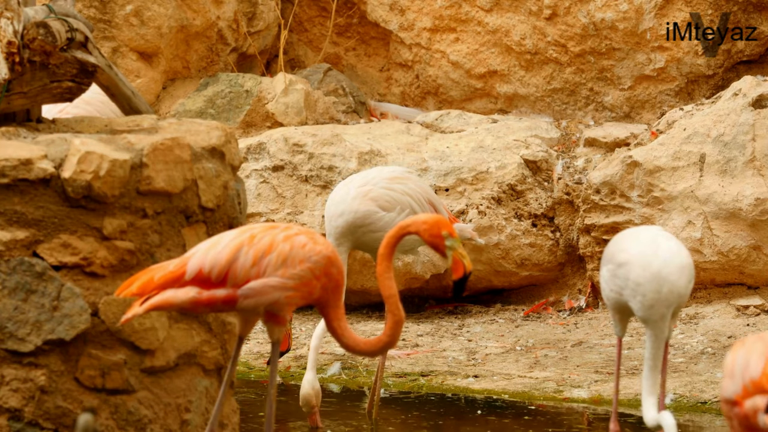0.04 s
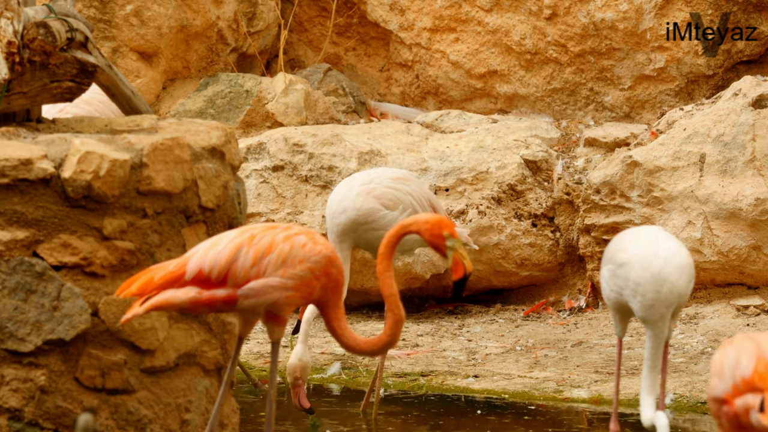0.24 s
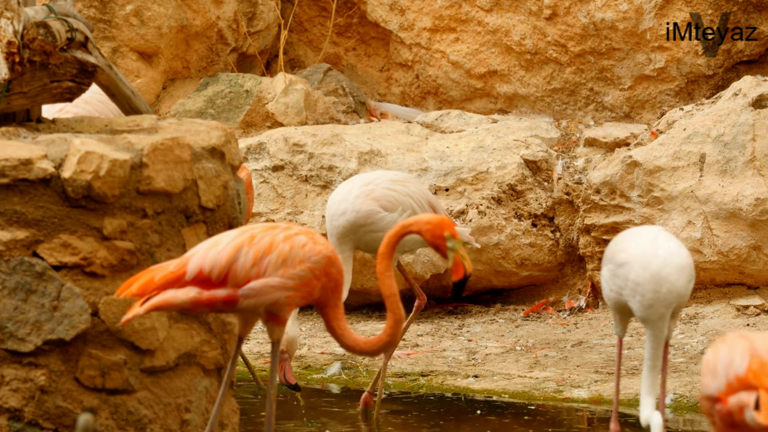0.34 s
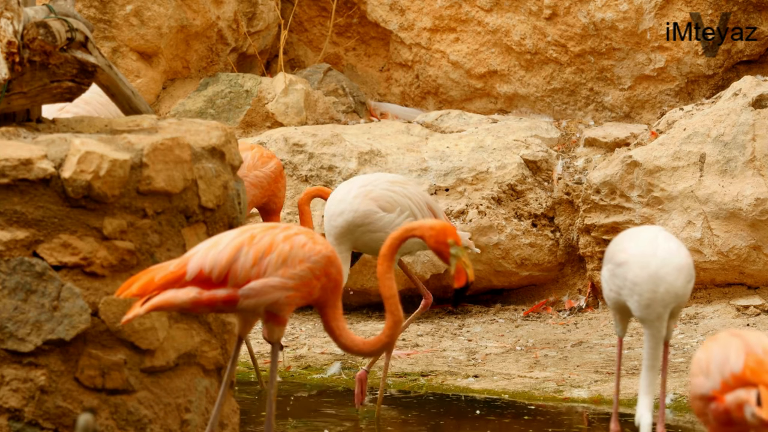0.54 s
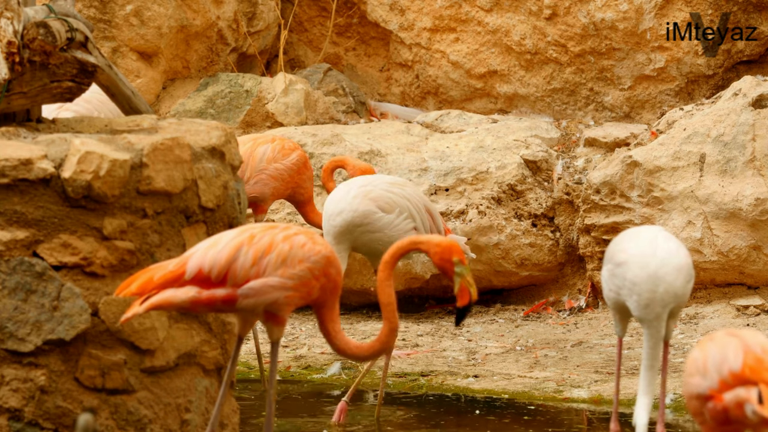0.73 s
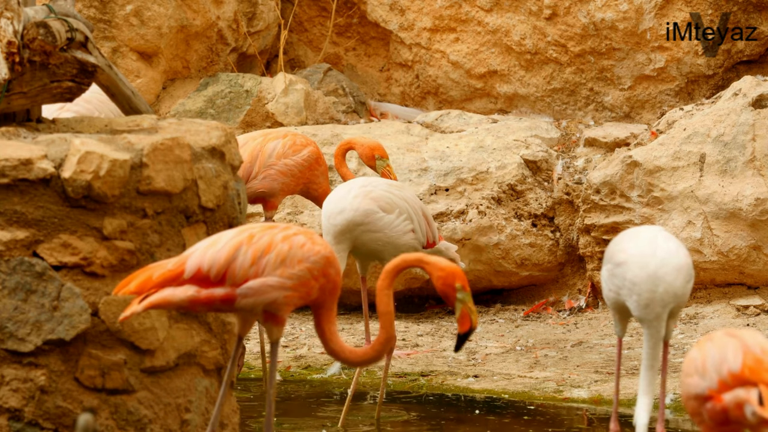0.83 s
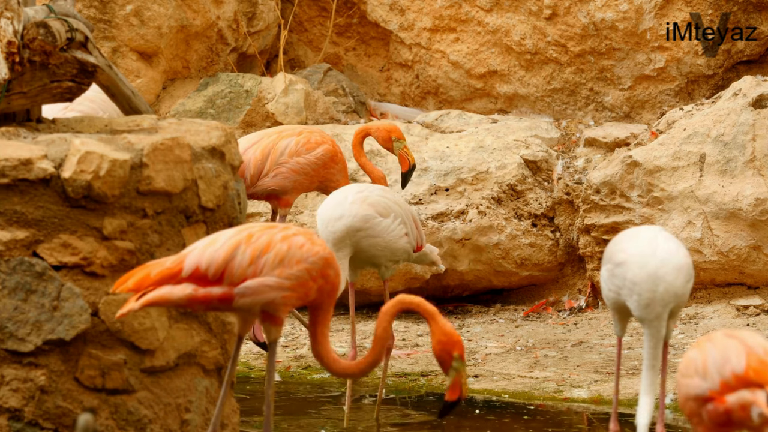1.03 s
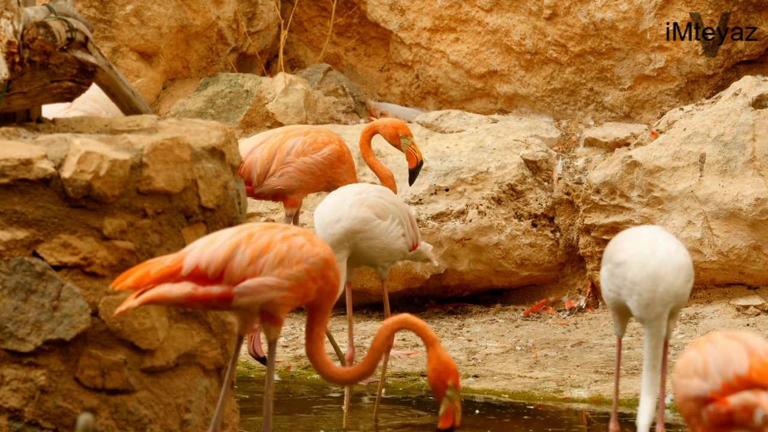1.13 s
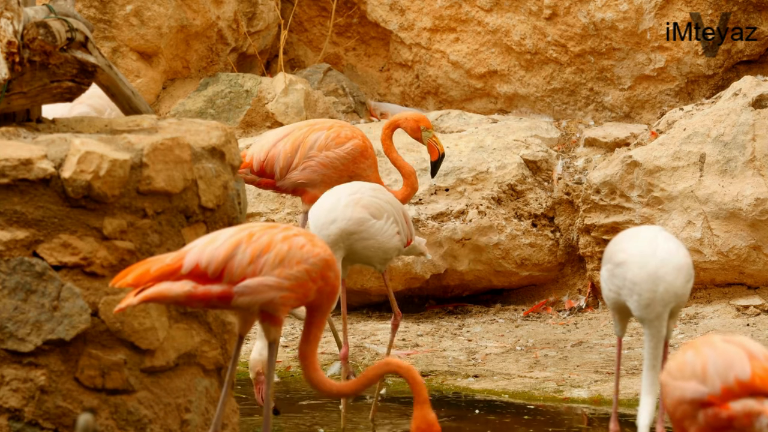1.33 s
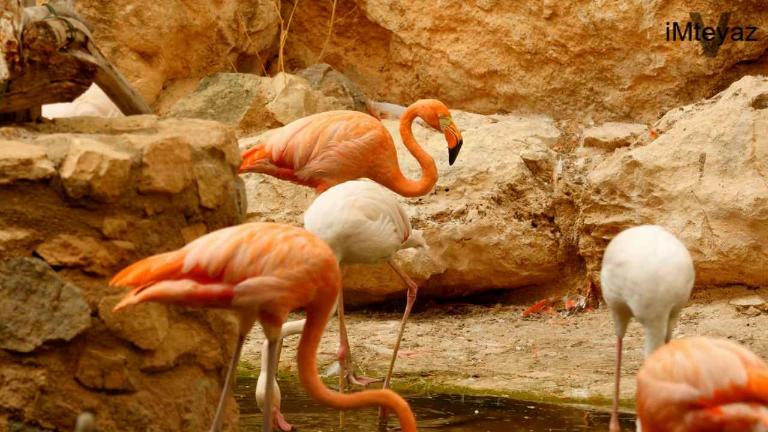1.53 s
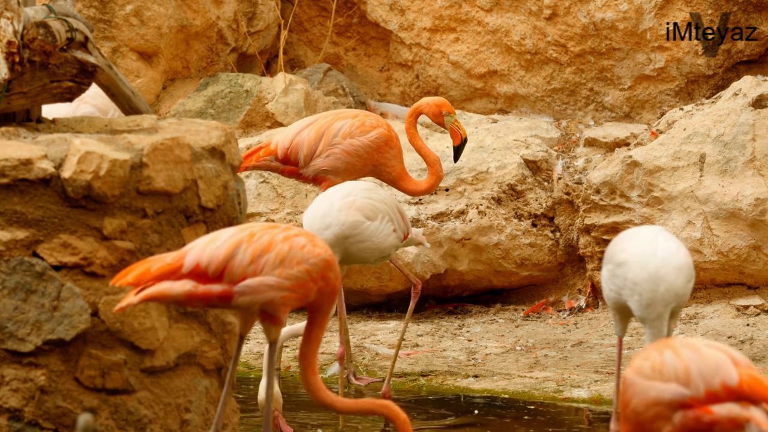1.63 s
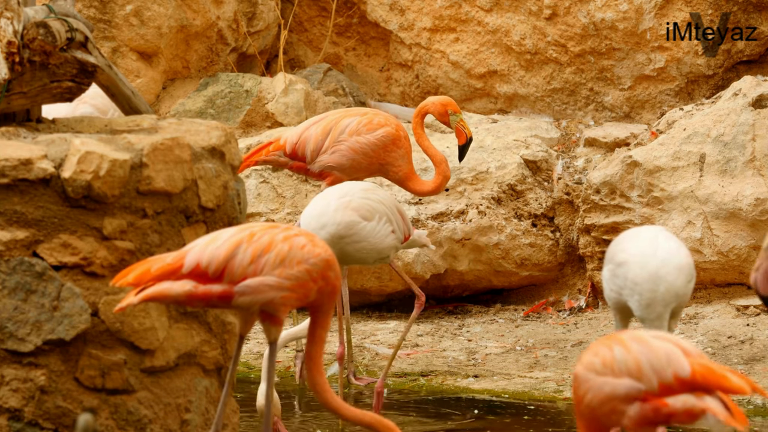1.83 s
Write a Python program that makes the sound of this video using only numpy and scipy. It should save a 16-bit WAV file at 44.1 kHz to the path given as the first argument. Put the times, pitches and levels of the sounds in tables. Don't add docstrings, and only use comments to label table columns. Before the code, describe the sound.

Flamingo honks, very short, raspy and nasal, sound near centre at about 0.2, 0.46, 0.73, 1.0, 1.28 and 1.56 seconds. The first are loud and bright; later ones are lower, duller and softer. A second bird answers faintly far right at 0.6, 1.0, 1.25 and 1.5. Rocks return echoes and a blurred tail. Soft grunts from 0.8, swelling distant rumble, thin steady insect hiss.

```python
import sys
import numpy as np
from scipy import signal
from scipy.io import wavfile
from scipy.ndimage import uniform_filter1d

SR = 44100
rng = np.random.default_rng(int(sys.argv[2]) if len(sys.argv) > 2 else 0)


def bounce(signal):
    frames = np.transpose(np.atleast_2d(signal))
    limited = np.clip(frames, -1, 1)
    pcm = np.round(limited * 32767).astype(np.int16)
    wavfile.write(sys.argv[1], SR, pcm)


def amplitude_ratio(level_db):
    exponent = np.asarray(level_db, float) / 20
    return 10 ** exponent


N = 81585
LEAD_S = 0.4
TRACK = N + int(LEAD_S * SR)
CALL_SIZE = 4096
CALL_LEAD = 8


def level(x, db):
    return x * amplitude_ratio(db) / np.sqrt(np.mean(x ** 2))


def ring(x, hz, width_hz):
    return signal.lfilter(*signal.iirpeak(hz, hz / width_hz, fs=SR), x)


def walk(rate, size):
    hold = int(SR / rate)
    stairs = np.repeat(rng.standard_normal(size // hold + 1), hold)
    return 1.37 * uniform_filter1d(uniform_filter1d(stairs, hold), hold)[:size]


def curve(table, hz):
    points = np.array(table)
    return np.interp(np.log(hz), np.log(points[:, 0]), points[:, 1])


def stereo(mid, side):
    return np.array([mid + side, mid - side])


def throat(length, hz, chance, size):
    sag = 0.34
    jitter, shimmer_db, breath_db = 0.055, 2.2, -18
    sample = np.arange(size)
    share = sample / SR / length
    turns = np.cumsum(hz * (1 - sag * np.minimum(share, 1))) / SR

    pulse = np.arange(64)
    uneven = jitter * chance[:64] * (pulse > 0)
    at = np.interp(pulse + uneven, turns, sample) + CALL_LEAD
    near = sample[None] - at[:, None]
    strength = amplitude_ratio(shimmer_db * chance[64:128])[:, None]
    clicks = (strength * np.sinc(near) * np.exp(-(near / 6) ** 2)).sum(axis=0)
    breath = amplitude_ratio(breath_db) * np.sqrt(hz / SR) * chance[128:128 + size]
    return clicks + breath, share, turns


def effort(share, peak, start_db, end_db):
    held = min(peak + 0.29, 0.95)
    swell_db = np.interp(share, [0, peak, held, 1], [start_db, 0, max(-3, end_db), end_db])
    stop = np.clip((1.1 - share) / 0.3, 0, 1)
    return amplitude_ratio(swell_db) * stop


def put(out, x, start):
    i = int((start + LEAD_S) * SR) - CALL_LEAD
    return out + np.pad(x, (i, TRACK - i - len(x)))


def near_bird():
    # start in seconds, level in dB, length in seconds, first pitch in Hz, brightness in dB per octave.
    near_honks = [
        (-.075, -16.5, 0.041, 724.8, -4.5),
        (.2050, -13, 0.036, 725.2, 3),
        (0.4627, -13.5, 0.036, 722, 1.5),
        (0.7327, -15.5, .038, 690, -3),
        (1.0023, -16, .042, 657, -6.5),
        (1.277, -18.5, 0.046, 674.8, -8.5),
        (1.5570, -16, .036, 678.5, -5),
    ]
    # centre of the lifted region in Hz, lift in dB, chest in dB,
    # share of the length at full effort, start level in dB.
    bill_openings = [(2500, 2.5, -25, 0.57, -1), (2117, 10, 2.5, 0.2, -14), (3030, 1.5, 6.5, 0.55, 1),
                     (2570, 3.5, 5, 0.33, -13), (3000, 3.5, -8, 0.42, -7.5), (1960, 7, -2.5, 0.44, -4.5),
                     (3600, 2.5, 3, 0.49, -7)]
    # centre in Hz, width in Hz, level in dB.
    pipe_modes = [(1144, 240, -24.5), (1431.5, 87.4, -3), (2055, 75, 1), (2465, 254, -1.5), (2979, 225, -1),
                  (3792, 224, -4), (4423, 115, -5), (5047, 64, -4), (5490, 88, -35), (6416, 560, -14.5),
                  (9010, 200, -12)]
    bill_octaves = 0.089
    neck_spread, neck_db = 0.01, 1.5
    rasp_hz, rasp_width_hz = 7140, 5000
    rasp_db, rasp_turn, rasp_room_db = -16, 1.5, -12.5
    body = signal.butter(3, [950, 5030], "band", fs=SR, output="sos")

    out, sent = np.zeros(TRACK), np.zeros(TRACK)
    chances = rng.standard_normal((len(near_honks), CALL_SIZE + 128))
    necks = rng.standard_normal((len(near_honks), 2, 16))
    for honk, bill, chance, neck in zip(near_honks, bill_openings, chances, necks):
        start, db, length, hz, bright_db = honk
        bill_hz, lift_db, chest_db, peak, start_db = bill
        pulses, share, turns = throat(length, hz, chance, CALL_SIZE)
        low = effort(share, 0.13, start_db / 2, -17)
        high = effort(share, peak, start_db, -18.5)

        call = 0
        for (mode_hz, width_hz, mode_db), shift, jolt in zip(pipe_modes, *neck):
            lift = lift_db * np.exp(-(np.log2(mode_hz / bill_hz) / bill_octaves) ** 2)
            tilt = bright_db * np.log2(mode_hz / 2000)
            driven = pulses * (low if mode_hz < 1700 else high)
            mode = ring(driven, mode_hz * (1 + neck_spread * shift), width_hz)
            call = call + amplitude_ratio(mode_db + lift + tilt + neck_db * jolt) * mode
        call = -level(signal.sosfilt(body, call), 0) * np.sqrt(length * SR / CALL_SIZE)

        chest = amplitude_ratio(-23) * np.sin(2 * np.pi * turns) + amplitude_ratio(-22) * np.sin(4 * np.pi * turns)
        call = call + chest * amplitude_ratio(chest_db) * effort(share, 0.7, -5, -4)

        puffs = chance[::-1][:CALL_SIZE] * np.exp(-(turns % 1) / 0.72) * high
        rasp = ring(ring(puffs, rasp_hz, rasp_width_hz), rasp_hz, rasp_width_hz * 2)
        direct = call + amplitude_ratio(rasp_db + rasp_turn * bright_db) * rasp
        out = put(out, amplitude_ratio(db) * direct, start)
        sent = put(sent, amplitude_ratio(db) * (call + amplitude_ratio(rasp_room_db) * rasp), start)
    return out, sent


def side_bird():
    # start in seconds, level in dB, length in seconds, pitch in Hz, lowest strong throat mode in Hz.
    answer_notes = [
        (0.591, -39, 0.038, 456.4, 990),
        (0.981, -32.5, 0.061, 432.8, 924),
        (1.2521, -28, 0.0176, 526, 1117),
        (1.5279, -31, 0.022, 551.6, 1045),
    ]
    # ratio to that mode, width in Hz, level in dB.
    throat_modes = [(.5, 200, -18), (1, 220, 0), (1.4, 240, -5), (2.2, 400, -22), (4.5, 5000, -38)]
    out = np.zeros(TRACK)
    chances = rng.standard_normal((len(answer_notes), CALL_SIZE + 128))
    for (start, db, length, hz, mode_hz), chance in zip(answer_notes, chances):
        pulses, share, _ = throat(length * 3, hz, chance, CALL_SIZE)
        driven = pulses * effort(share * 3, 0.15, -2, -6)
        call = 0
        for ratio, width_hz, mode_db in throat_modes:
            mode = ring(ring(driven, mode_hz * ratio, width_hz), mode_hz * ratio, width_hz)
            call = call + amplitude_ratio(mode_db) * mode
        out = put(out, level(call, db), start)
    return out


def echoes(x):
    # delay in seconds, level in dB, left over right in dB.
    reflections = [(.0052, -16.5, 3), (.0093, -11.5, -9.5), (.021, -12, 0), (0.032, -20.5, 5),
                   (0.063, -25.5, -14), (0.081, -30, -5)]
    out = 0
    for delay, db, pan in reflections:
        late = np.pad(x, (int(delay * SR), 0))[:TRACK]
        out = out + amplitude_ratio(db + np.array([[pan], [-pan]]) / 2) * late
    return out


def rocks(x, wet_db):
    # frequency in Hz, time to fall 60 dB in seconds.
    tail_decay = [(500, 0.55), (1400, 0.31), (2500, 0.5), (4500, 0.56), (8000, 0.35), (13000, 1)]
    build_s, side_db = 0.036, -1
    scatter, scatter_hz = 0.7, 250
    t = np.arange(SR) / SR
    tail = np.zeros((2, SR))
    for hz in 200 * 2 ** np.arange(0, 6.5, 0.5):
        band = ring(rng.standard_normal((2, SR)), hz, hz / 2.8)
        tail = tail + band * amplitude_ratio(-60 * t / curve(tail_decay, hz))
    tail = tail * (1 - np.exp(-t / build_s))
    tail = tail / np.sqrt((tail ** 2).sum(axis=1, keepdims=True)) * amplitude_ratio(wet_db)
    blurred = x[None] * (1 + scatter * walk(scatter_hz, TRACK))
    mid, side = signal.fftconvolve(blurred, tail, axes=1)[:, :TRACK]
    return stereo(mid, amplitude_ratio(side_db) * side)


def grunts():
    # start in seconds, level in dB, length in seconds, pitch in Hz.
    grunt_notes = [
        (.792, -34, 0.055, 230),
        (1.13, -37.5, 0.1, 238),
        (1.3, -42, .05, 265),
    ]
    out = np.zeros(TRACK)
    for start, db, length, hz in grunt_notes:
        t = np.arange(int(length * SR)) / SR
        swell = np.sin(np.pi * (t / length) ** 0.46)
        out = put(out, amplitude_ratio(db) * swell * np.sin(2 * np.pi * hz * t), start)
    return out


def air():
    # frequency in Hz, level in dB per Hz.
    air_spectrum = [(18, -59), (30, -40), (253, -2.5), (881, -16), (1170, -5.5), (1600, -38), (1970, -6.5),
                    (5440, -23.5), (15000, -63)]
    # frequency in Hz, side level against mid in dB.
    air_spread = [(60, -15), (250, -6.5), (700, 1.5), (3000, -3), (12000, 5)]
    # time in seconds, lift of the bass in dB.
    traffic_swell = [(0, -1), (.4, 3.5), (.9, 7), (1.3, 7.5), (1.85, 5.5)]
    swell_top_hz, flicker_db = 650, 2
    out = 0
    swell = np.interp(np.arange(TRACK) / SR - LEAD_S, *np.array(traffic_swell).T)
    for hz in 30 * 2 ** np.arange(0, 9.1, 1 / 3):
        mid, side = ring(ring(rng.standard_normal((2, TRACK)), hz, hz / 3), hz, hz / 3)
        bass_lift = swell / (1 + (hz / swell_top_hz) ** 2)
        db = curve(air_spectrum, hz) + flicker_db * walk(8.53, TRACK) + bass_lift
        out = out + amplitude_ratio(db) * stereo(mid, amplitude_ratio(curve(air_spread, hz)) * side)
    return level(out, -37)


def insects():
    hz, width_hz = 5400, 520
    mid, side = ring(ring(rng.standard_normal((2, TRACK)), hz, width_hz), hz, width_hz)
    flicker = amplitude_ratio(1.5 * walk(24.73, TRACK))
    return level(flicker * stereo(mid, amplitude_ratio(-11) * side), -45)


def scene():
    near, sent = near_bird()
    far = side_bird()
    pan = amplitude_ratio(np.array([[1], [-1]]) / 2)
    ahead = near * pan + echoes(sent) + rocks(sent, -15)
    aside = stereo(amplitude_ratio(-7.5) * far, -amplitude_ratio(1.5) * far) + rocks(far, -4)
    return (ahead + aside + grunts() + air() + insects())[:, -N:]


def low_pass(x):
    return signal.sosfilt(signal.butter(12, 15690, fs=SR, output="sos"), x)


def record(dry):
    rounded = 1.6 * np.tanh(dry / 1.6)
    top_cut = signal.ellip(8, 0.2, 70, 15650, fs=SR, output="sos")
    mix = np.clip(signal.sosfilt(top_cut, rounded), -0.99, 0.99)
    return low_pass(mix)


dry = scene()
out = record(dry)
bounce(out)
```